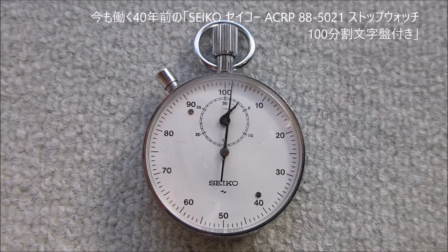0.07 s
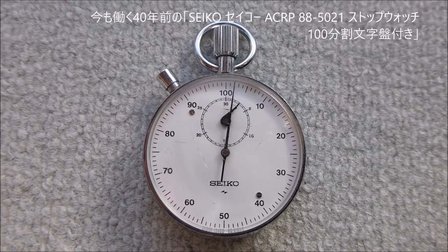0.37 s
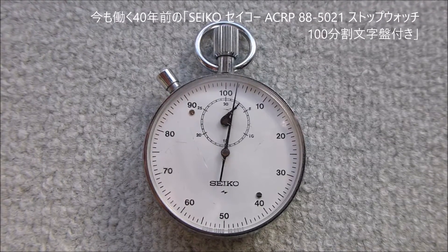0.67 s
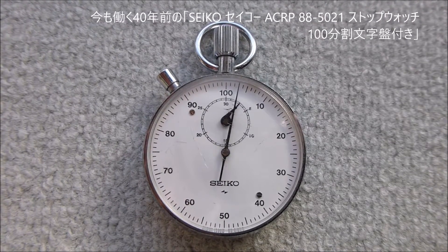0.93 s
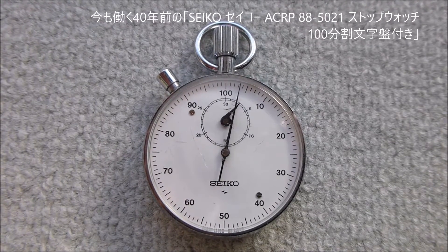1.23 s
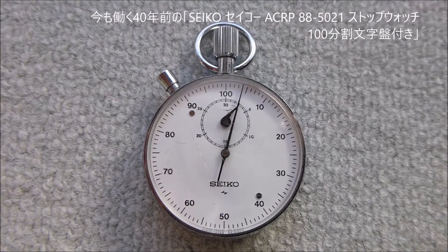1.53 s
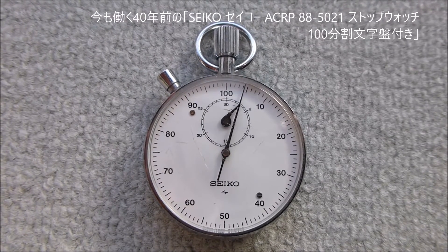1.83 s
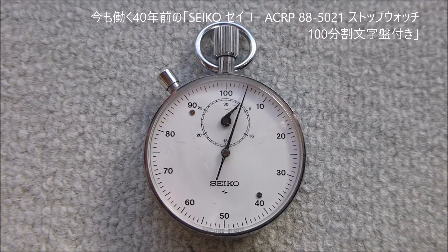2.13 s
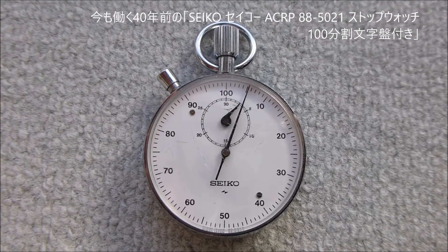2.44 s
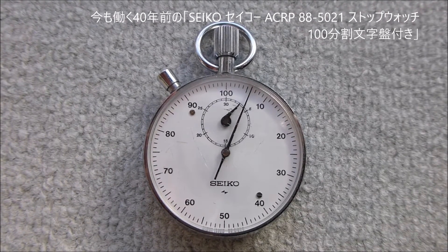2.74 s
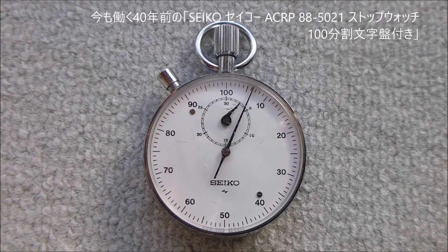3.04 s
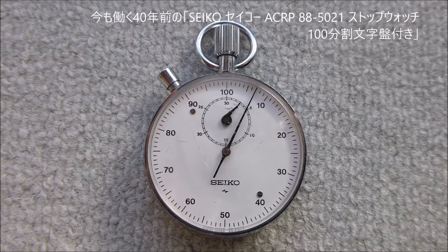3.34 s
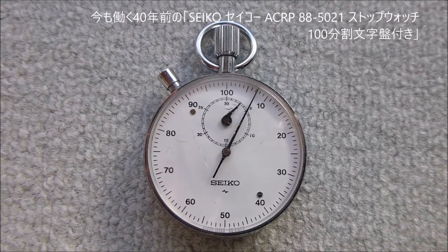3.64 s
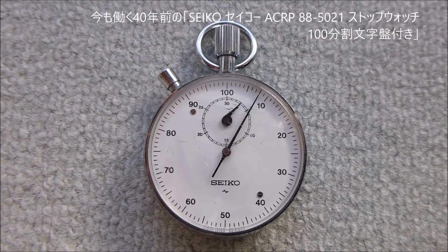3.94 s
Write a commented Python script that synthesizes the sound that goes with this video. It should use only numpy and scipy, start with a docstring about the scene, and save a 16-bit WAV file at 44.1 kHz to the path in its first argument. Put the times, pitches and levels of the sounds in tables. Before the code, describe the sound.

Close by, a mechanical stopwatch starts with one sharp button click and keeps up light, fast, metallic ticking. Behind it are the steady hiss and low hum of a quiet room, with a single soft knock later on.

```python
"""Stopwatch on carpet

A mechanical stopwatch lies close by in a quiet room. Its button snaps once, then the escapement ticks
five times a second: a faint unlocking click, a slide, then the louder drop of a tooth, each ringing
the steel works and the case. Behind it sit a low hum, an even hiss, faint stirrings and one dull knock."""
import sys
import numpy as np
from scipy import signal
from scipy.fft import rfft, irfft
from scipy.io import wavfile

SR = 44100
rng = np.random.default_rng(int(sys.argv[2]) if len(sys.argv) > 2 else 0)


def wav_out(sig):
    """Save sig, one row per channel (or a flat mono array), as 16-bit PCM at SR to the path in sys.argv[1]."""
    wavfile.write(sys.argv[1], SR, np.round(np.clip(np.atleast_2d(sig).T, -1, 1) * 32767).astype(np.int16))


N = 176400

# room hiss common to both sides (frequency [Hz], density [dB per Hz])
HISS_MID = [(20, -92), (45, -98), (75, -100.5), (105, -89.5), (220, -88), (300, -90.5), (380, -90),
            (470, -94), (590, -93.5), (700, -97.5), (1250, -99), (1700, -102.5), (2400, -105), (3500, -107),
            (4050, -104.5), (4350, -105.5), (4950, -101), (5500, -104), (7000, -105), (9500, -106),
            (12500, -108.5), (15200, -111), (15900, -135)]
# room hiss in opposite phase left and right, for width (frequency [Hz], density [dB per Hz])
HISS_SIDE = [(20, -101), (55, -107), (100, -100), (180, -95.5), (450, -95), (750, -92.5), (1100, -91),
             (1450, -93.5), (2100, -100.5), (3500, -106), (4050, -104), (4350, -105), (4900, -102),
             (5700, -105.5), (9000, -109), (12500, -112), (15200, -114), (15900, -138)]
# resonances in the room's hum (frequency [Hz], half width [Hz], rms level [dB])
HUM_BANDS = [(121.2, 1.3, -73.5), (145.6, 6.9, -69.5), (158.2, 3.7, -66.5), (177, 3.7, -72.5),
             (189.1, 6.9, -65), (390.2, 2.5, -77.5), (583, 17, -82.5), (973, 3.8, -84), (1480, 58, -78)]
# faint stirrings (time [s], frequency [Hz], half width [Hz], half length [s], rms at the crest [dB])
STIRRINGS = [(2.31, 1150, 180, .04, -65.5), (2.31, 7700, 1300, .035, -63.5), (2.1, 6900, 1900, 0.02, -67),
             (3.012, 2700, 1800, 0.0023, -58)]
# contacts in the button's snap (time [s], level [dB])
SNAP_CONTACTS = [(0.088, -60), (0.094, -58.5), (0.0957, -34.5), (0.0986, -49)]
# modes of the button and its lever (frequency [Hz], left level [dB], right level [dB], t60 [s])
BUTTON_MODES = [(1184, -15.5, -12, 0.016), (1810, -24.5, -21, 0.017), (2200, -23, -12, 0.021),
                (2595, -15, -8, 0.012), (3260, -11, -9.5, 0.014), (4060, -14, -9, 0.019),
                (4593, -17, -14, 0.02), (5130, -8, -8, 0.0095), (5835, -5, -14, 0.009),
                (6190, 5, 5, 0.0069), (6830, -4, -16, 0.007), (7490, -9, -15, 0.01),
                (8360, -12, -14, 0.0062), (9800, -17, -11, .005), (10640, -5, 2, 0.0045),
                (11000, 3.5, -8, 0.0043), (12500, -5, -12, .004), (13200, -8, -3, 0.0049),
                (14150, -6, 1, 0.0037), (15250, -7, -4, 0.0037)]
# modes of the steel escapement, the ping (frequency [Hz], level [dB], t60 [s], polarity [+1 or -1])
STEEL_MODES = [(8380, -19, .014, 1), (8650, -16, .016, 1), (8965, 0, .014, 1), (9170, -3.5, .008, -1),
               (9580, -8.5, .009, 1), (10130, -15, .008, -1)]
# modes of the case around it (frequency [Hz], level [dB], t60 [s], polarity [+1 or -1])
CASE_MODES = [(3990, -10.5, .011, 1), (4950, -7.5, .009, -1), (5230, -8, .009, 1), (7750, -11, .010, -1),
              (11300, -6, .008, 1), (12050, -8, .006, 1), (12540, 0, .010, -1), (12900, -7, .008, -1),
              (14100, -11, .006, 1)]
# strength of each tooth's drop in turn (ping level [dB], case level [dB])
DROP_LEVELS = [(-58.5, -61.5), (-52.5, -61), (-51.5, -61), (-49.5, -64), (-46.5, -60.5), (-53, -63),
               (-50.5, -60), (-52.5, -58.5), (-49, -58.5), (-53.5, -62), (-58.5, -57), (-47.5, -60.5),
               (-48.5, -58), (-50.5, -60), (-47.5, -61.5), (-51, -59), (-46.5, -56.5), (-51, -61.5),
               (-48.5, -59), (-53, -61)]
# modes rung by the knock (frequency [Hz], level [dB], t60 [s])
KNOCK_MODES = [(315, 0, 0.069), (398, 4, 0.077)]

HIT_SAMPLES, LEVEL_SAMPLES = 1764, 441  # a hit lasts 40 ms; its energy is set against 10 ms
FIRST_BEAT_S, BEAT_S, TOCK_EARLY_S = .1347, .19997, .0013
UNLOCK_LEAD_S, SLIDE_LEAD_S = .0096, .0035  # ahead of the drop
TICK_PAN_DB = 1.14  # leans left


def from_db(db):
    """Decibels to gain."""
    return 10 ** (np.asarray(db) / 20)


def add(out, start_s, sound):
    """Mix a short stereo sound in at its cue."""
    i = int(start_s * SR)
    out[:, i:i + sound.shape[1]] += sound


def hiss(spectrum):
    """Steady noise shaped to a density curve."""
    hz, db = np.transpose(spectrum)
    f = np.maximum(np.arange(N // 2 + 1) * SR / N, 1)
    density = from_db(np.interp(np.log(f), np.log(hz), db))
    return irfft(rfft(rng.standard_normal(N)) * density, N) * np.sqrt(SR / 2)


def narrow_noise(hz, half_width_hz):
    """Noise through a steep resonance, at rms 1: the narrower the band, the slower it wavers."""
    f = np.arange(N // 2 + 1) * SR / N
    band = irfft(rfft(rng.standard_normal(N)) / (1 + ((f - hz) / half_width_hz) ** 2), N)
    return band / band.std()


def room_tone():
    """The bed: a wide, even hiss, a wavering low hum and a few faint stirrings."""
    t = np.arange(N) / SR
    air = hiss(HISS_MID) + hiss(HISS_SIDE) * np.array([[1], [-1]])
    hum = sum(from_db(db) * narrow_noise(hz, width) for hz, width, db in HUM_BANDS)
    stirrings = sum(from_db(db) * np.exp(-((t - s) / length) ** 2) * narrow_noise(hz, width)
                    for s, hz, width, length, db in STIRRINGS)
    return air + hum + stirrings


def unit_hit(sound):
    """Scale a stereo hit to the energy of 10 ms at rms 1."""
    return sound / np.sqrt(np.sum(sound ** 2) / 2 / LEVEL_SAMPLES)


def rebounds(t60, per_second=6000):
    """A dying run of tiny random impacts after a contact."""
    t = np.arange(HIT_SAMPLES) / SR
    impacts = rng.random(HIT_SAMPLES) < per_second / SR
    return impacts * rng.standard_normal(HIT_SAMPLES) * from_db(-60 * t / t60)


def ring(push, hz, t60, band_hz=900):
    """One mode draws on the band of the push around its pitch, builds up for a moment and rings out."""
    w = 2 * np.pi * hz / SR
    r = np.exp(-np.pi * band_hz / SR)
    drive = signal.lfilter([1, 0, -1], [1, -2 * r * np.cos(w), r * r], push + 1e-18) * (1 - r * r) / 2
    decay = from_db(-60 / (t60 * SR))
    return signal.lfilter([0, np.sin(w)], [1, -2 * decay * np.cos(w), decay * decay], drive + 1e-18)


def crack(push, low_cut_hz):
    """The dry, bright edge of the impacts themselves."""
    low_cut = signal.butter(2, low_cut_hz, "high", fs=SR, output="sos")
    return unit_hit(signal.sosfilt(low_cut, push + 1e-18))


def button():
    """The lever snaps over in a few quick, rattling contacts, coloured differently on each side."""
    out = np.zeros((2, N))
    for s, db in SNAP_CONTACTS:
        rattle = .25 * np.array([rebounds(t60=.007), rebounds(t60=.007)])
        push = rattle + signal.unit_impulse(HIT_SAMPLES)
        body = sum((-1) ** k * from_db([[left], [right]]) * ring(push, hz, t60)
                   for k, (hz, left, right, t60) in enumerate(BUTTON_MODES))
        edge = from_db(-9) * crack(rattle, low_cut_hz=5000)
        add(out, s, from_db(db) * (unit_hit(body) + edge))
    return out


def chatter(stereo_width, t60=.021):
    """Rebounds inside the escapement, partly different on each side."""
    return .42 * (rebounds(t60) + stereo_width * rebounds(t60) * np.array([[1], [-1]]))


def struck(push, modes, spread_db=2.5):
    """A part rings under a push; each contact favours its modes a little differently."""
    return unit_hit(sum(polarity * from_db(db + spread_db * rng.standard_normal()) * ring(push, hz, t60)
                        for hz, db, t60, polarity in modes))


def contact(ping_db, case_db, firmness):
    """One touch in the escapement: an impact and its chatter ping the steel and shake the case."""
    impact = firmness * signal.unit_impulse(HIT_SAMPLES)
    ping = struck(impact + chatter(stereo_width=.15), STEEL_MODES)
    shake = .4 * impact + chatter(stereo_width=.55)  # the case is shaken mostly by the chatter
    case = struck(shake, CASE_MODES) + from_db(-7) * crack(shake, low_cut_hz=6500)
    return from_db(ping_db) * ping + from_db(case_db) * case


def escapement():
    """On each beat the pallet lets go and slides along a tooth, then the tooth drops; tocks fall early."""
    out = np.zeros((2, N + SR))
    for k, (ping_db, case_db) in enumerate(DROP_LEVELS):
        drop_s = FIRST_BEAT_S + k * BEAT_S - k % 2 * TOCK_EARLY_S
        add(out, drop_s - UNLOCK_LEAD_S, contact(ping_db=-59, case_db=-68.5, firmness=2.0))
        add(out, drop_s - SLIDE_LEAD_S, contact(ping_db=-66.5, case_db=-71, firmness=0))
        add(out, drop_s, contact(ping_db, case_db, firmness=2.4))
    return out[:, :N] * from_db([[TICK_PAN_DB], [-TICK_PAN_DB]])


def with_room_tail(ticks, wet_db=-16, t60=.057):
    """The room answers the ticks with a short diffuse tail, different on each side."""
    t = np.arange(SR // 2) / SR
    tail = rng.standard_normal((2, len(t))) * from_db(-60 * t / t60)
    tail /= np.sqrt(np.sum(tail ** 2) / 2)
    return ticks + from_db(wet_db) * signal.fftconvolve(ticks, tail, axes=1)[:, :N]


def knock(start_s=2.531, gain_db=-47, attack_s=.0047):
    """A soft blow somewhere in the room swells briefly and rings in two low modes."""
    t = np.maximum(np.arange(N) / SR - start_s, 0)
    body = sum(from_db(db - 60 * t / t60) * np.sin(2 * np.pi * hz * t) for hz, db, t60 in KNOCK_MODES)
    return from_db(gain_db) * (1 - np.exp(-t / attack_s)) * body


def scene():
    """The mix: room tone under the snap, the ticking and the knock."""
    return button() + with_room_tail(escapement()) + knock() + room_tone()


def record(dry, mic_top_hz=14700, cutoff_hz=15800, dc_offset=-.003):
    """The microphone rolls off the very top, a steep cut follows, and the signal sits just off zero."""
    microphone = signal.butter(4, mic_top_hz, fs=SR, output="sos")
    high_cut = signal.ellip(10, .1, 70, cutoff_hz, fs=SR, output="sos")
    return signal.sosfilt(high_cut, signal.sosfilt(microphone, dry)) + dc_offset


dry = scene()
out = record(dry)
wav_out(out)
```